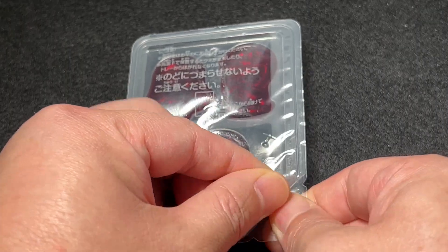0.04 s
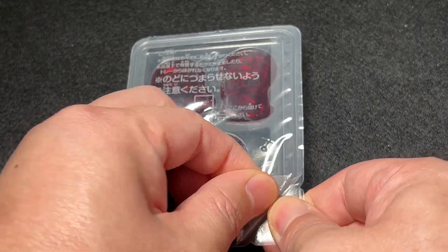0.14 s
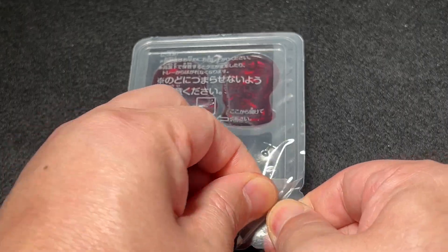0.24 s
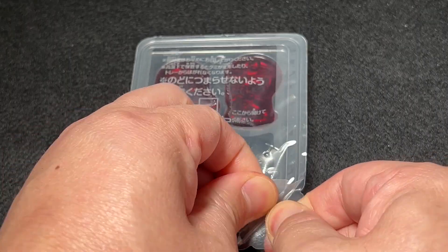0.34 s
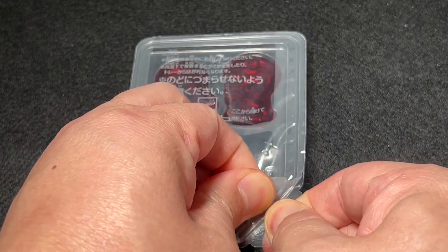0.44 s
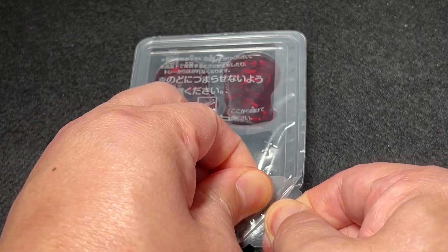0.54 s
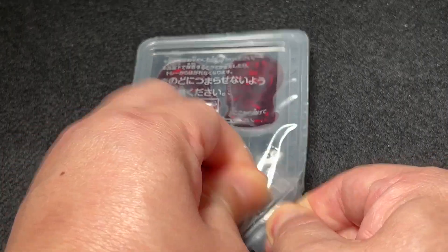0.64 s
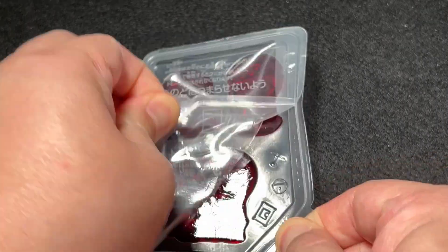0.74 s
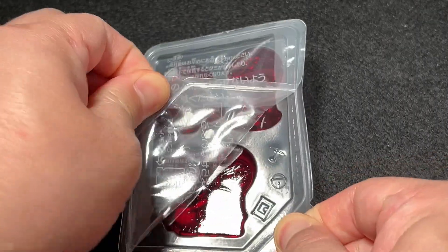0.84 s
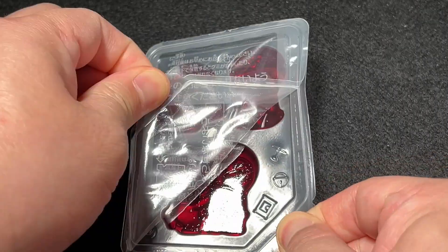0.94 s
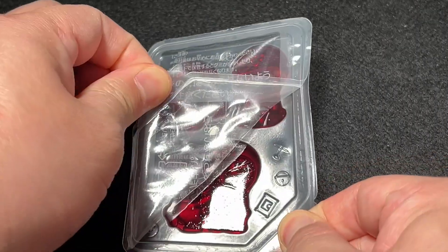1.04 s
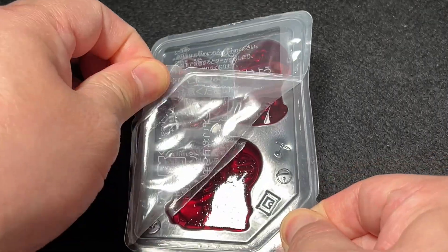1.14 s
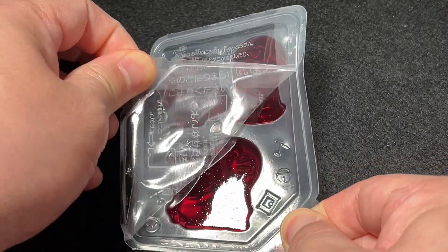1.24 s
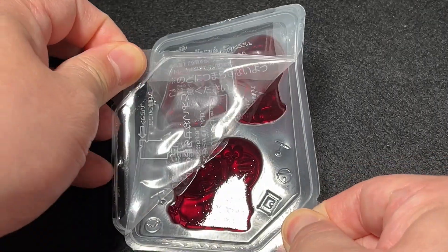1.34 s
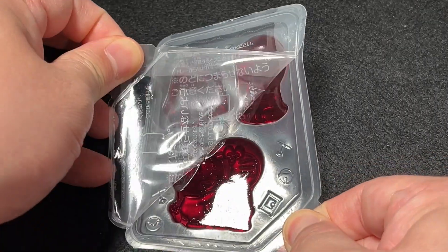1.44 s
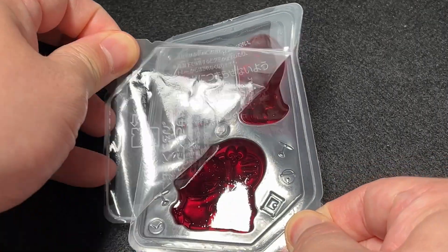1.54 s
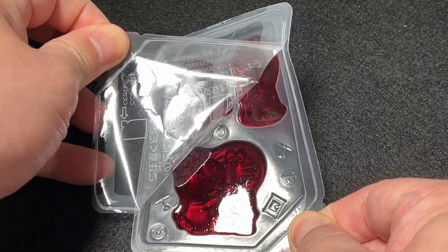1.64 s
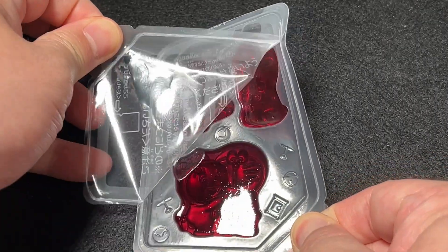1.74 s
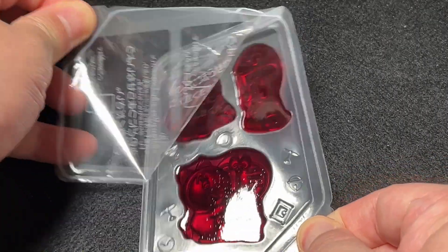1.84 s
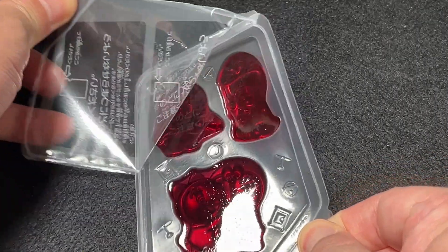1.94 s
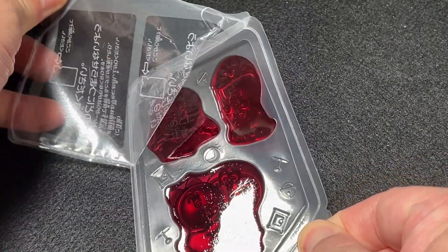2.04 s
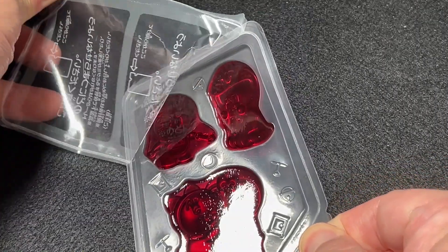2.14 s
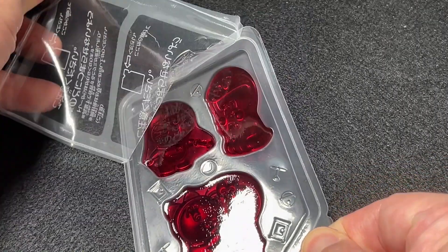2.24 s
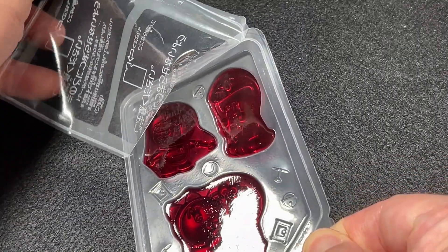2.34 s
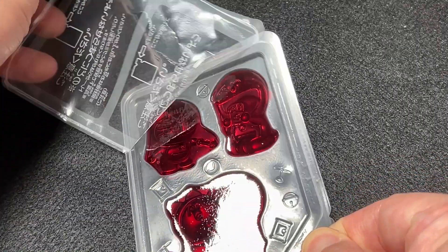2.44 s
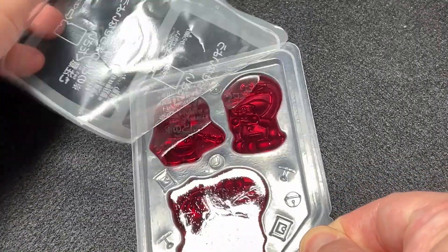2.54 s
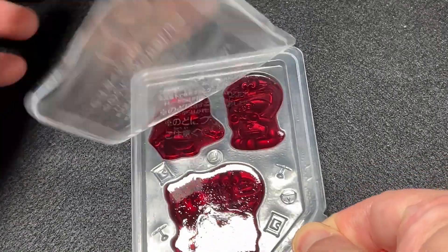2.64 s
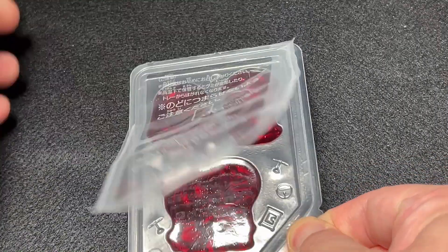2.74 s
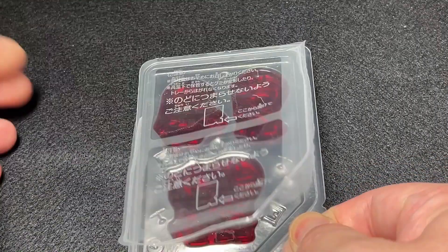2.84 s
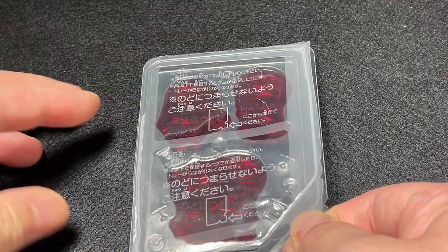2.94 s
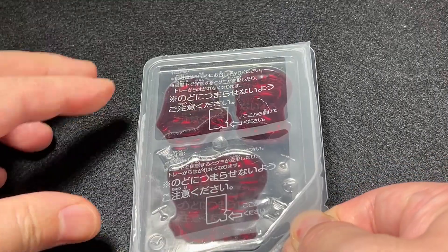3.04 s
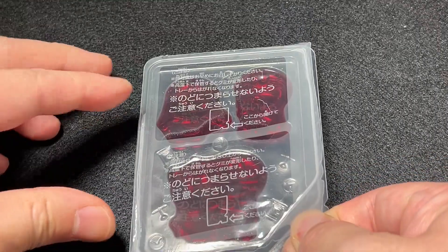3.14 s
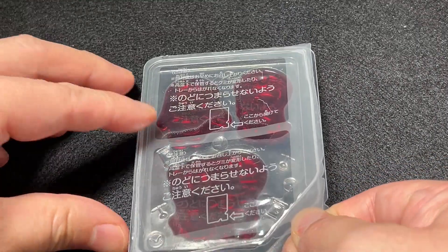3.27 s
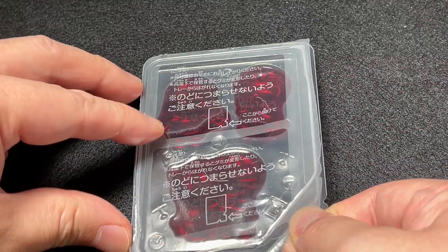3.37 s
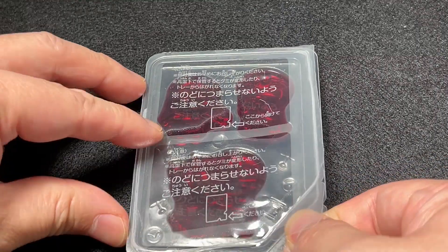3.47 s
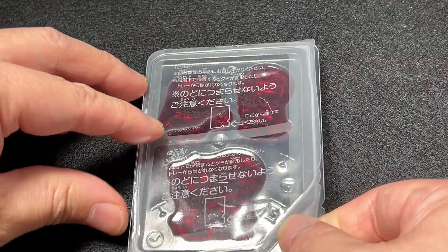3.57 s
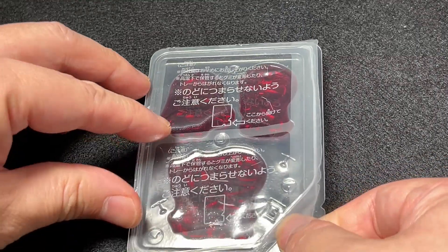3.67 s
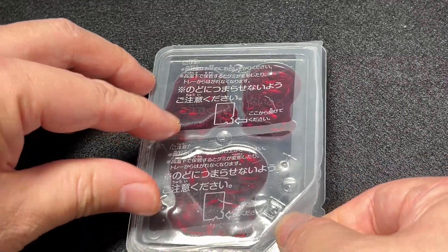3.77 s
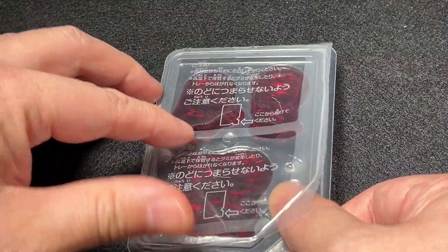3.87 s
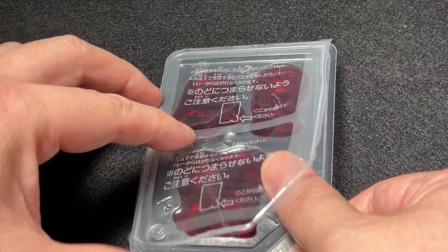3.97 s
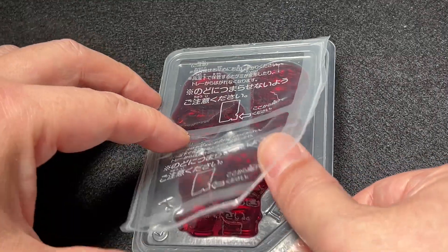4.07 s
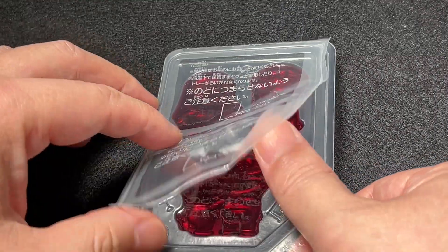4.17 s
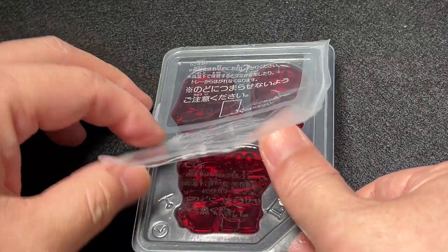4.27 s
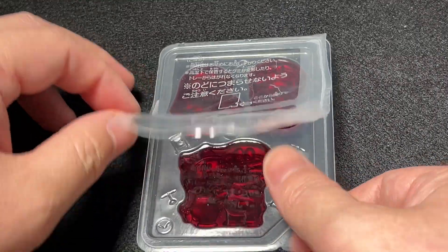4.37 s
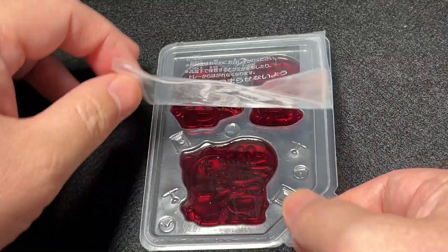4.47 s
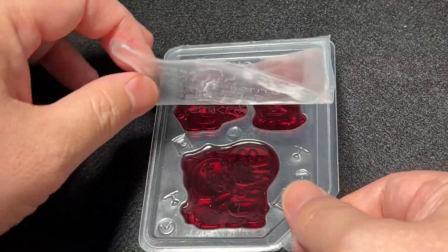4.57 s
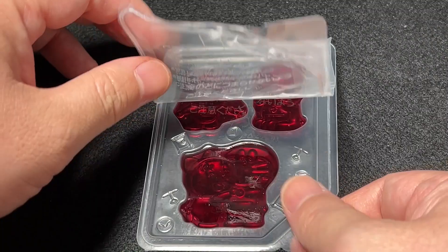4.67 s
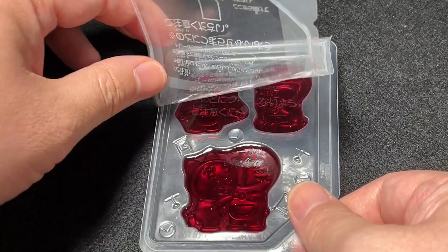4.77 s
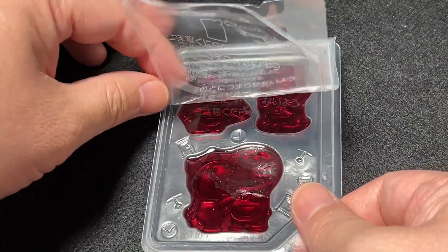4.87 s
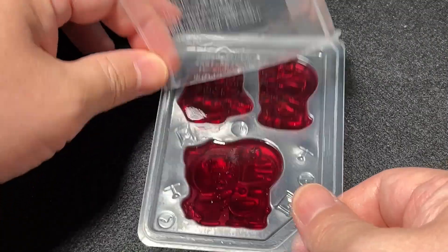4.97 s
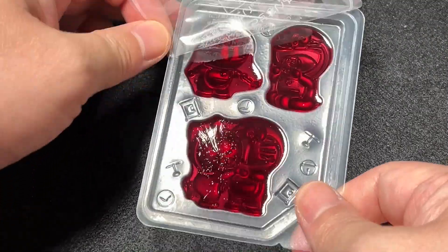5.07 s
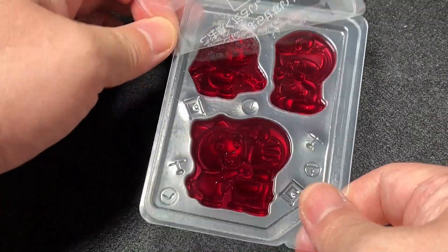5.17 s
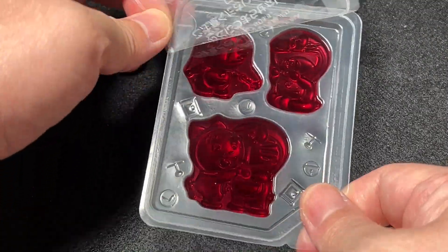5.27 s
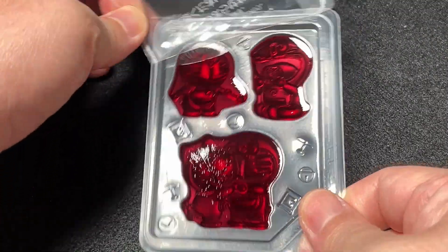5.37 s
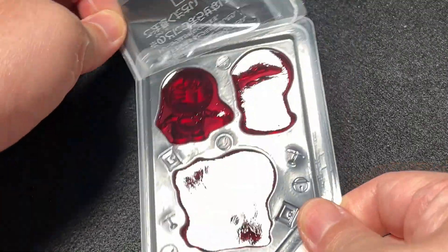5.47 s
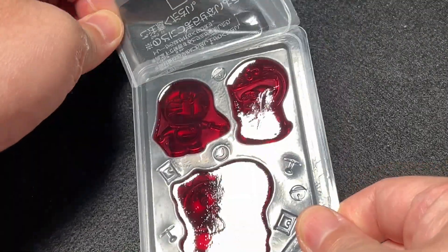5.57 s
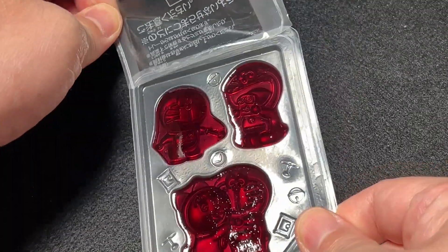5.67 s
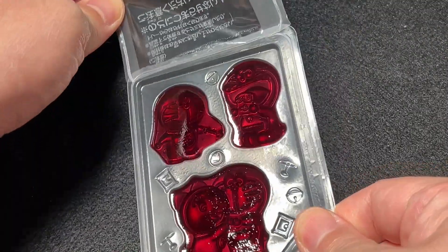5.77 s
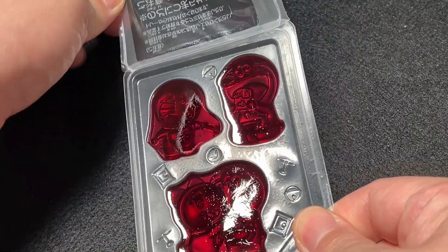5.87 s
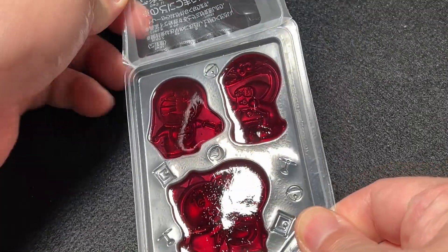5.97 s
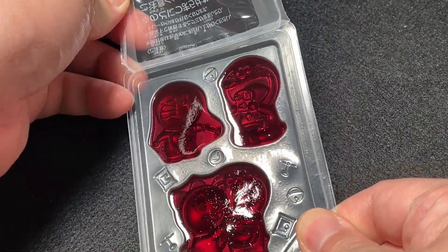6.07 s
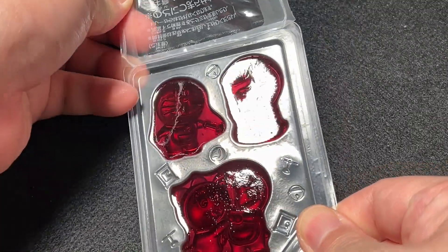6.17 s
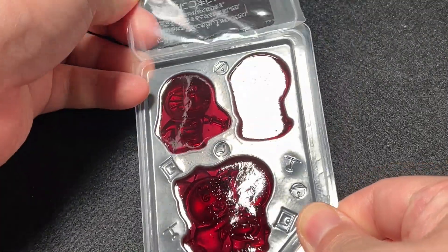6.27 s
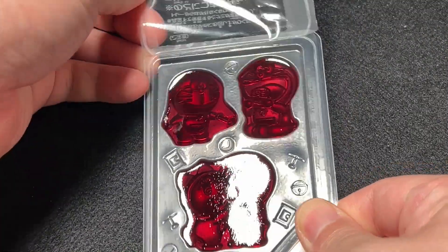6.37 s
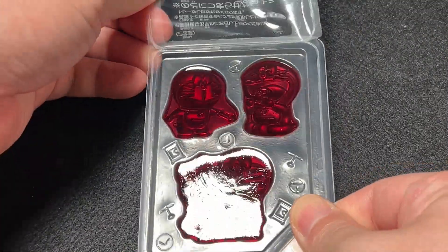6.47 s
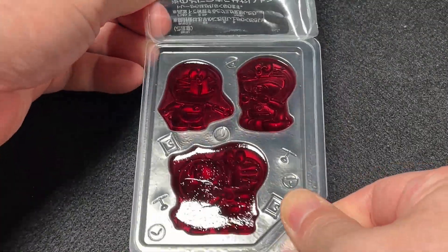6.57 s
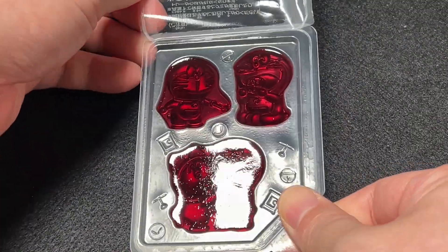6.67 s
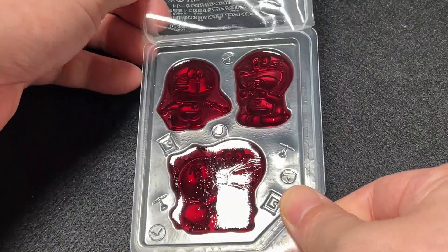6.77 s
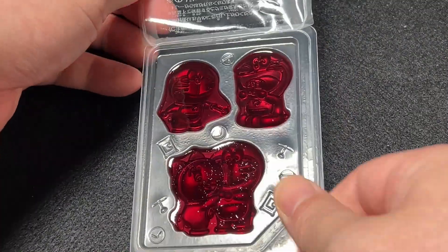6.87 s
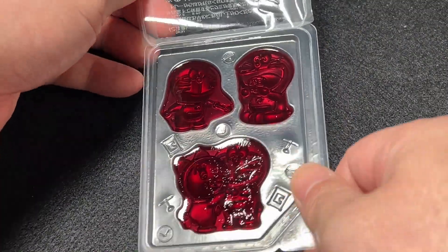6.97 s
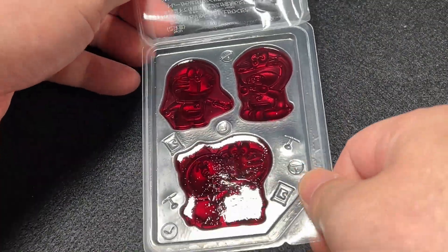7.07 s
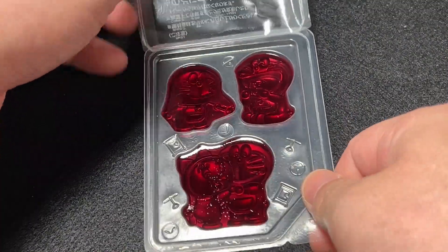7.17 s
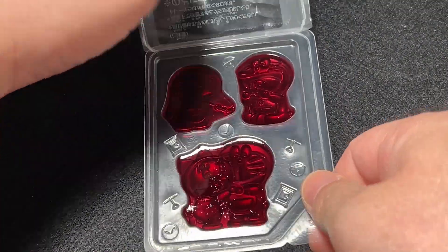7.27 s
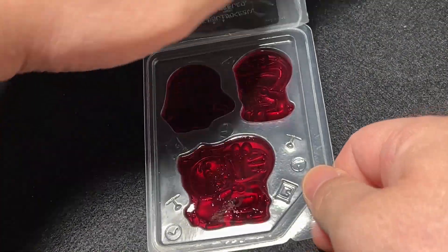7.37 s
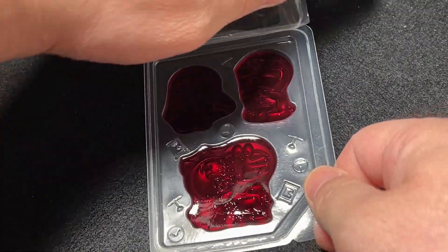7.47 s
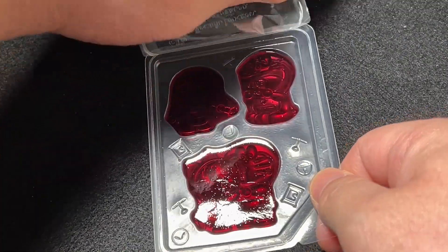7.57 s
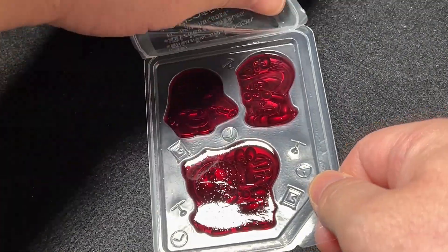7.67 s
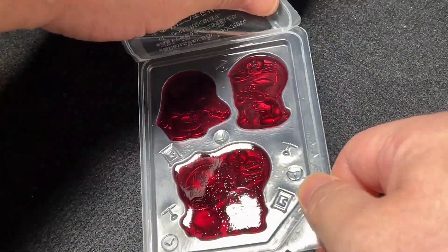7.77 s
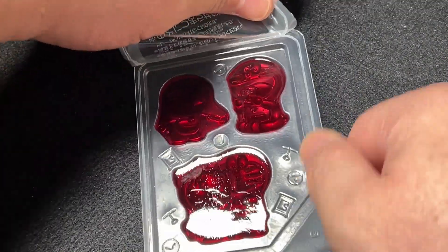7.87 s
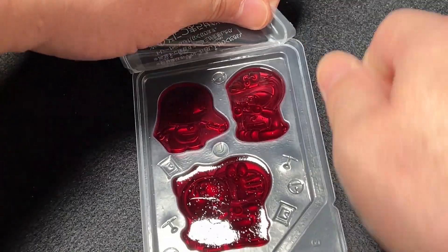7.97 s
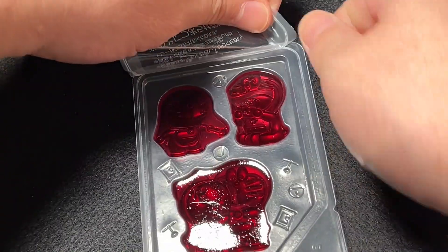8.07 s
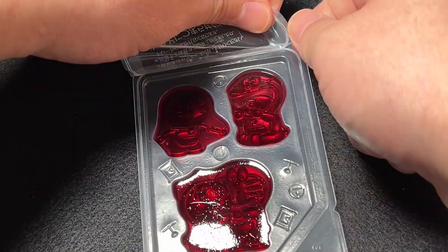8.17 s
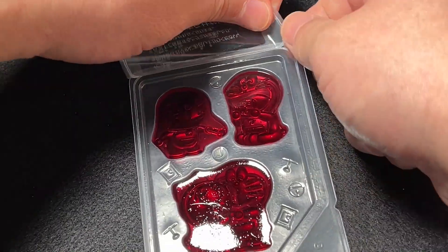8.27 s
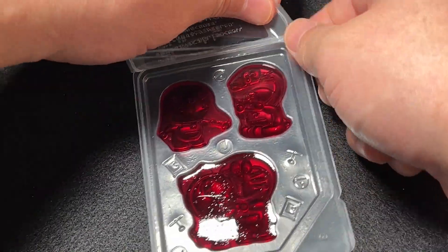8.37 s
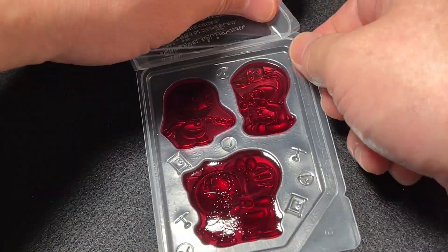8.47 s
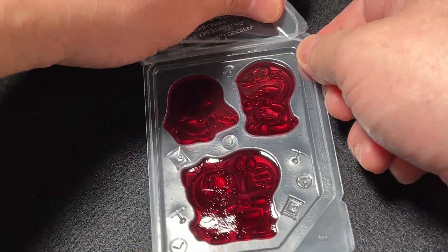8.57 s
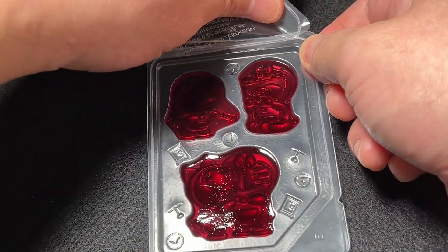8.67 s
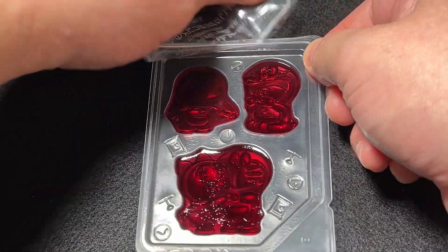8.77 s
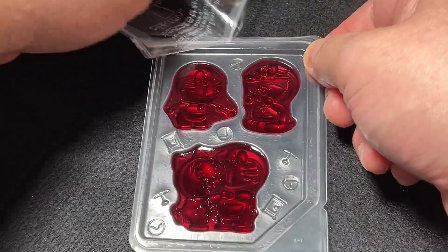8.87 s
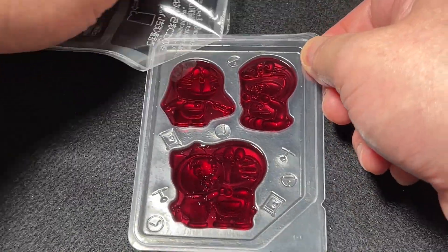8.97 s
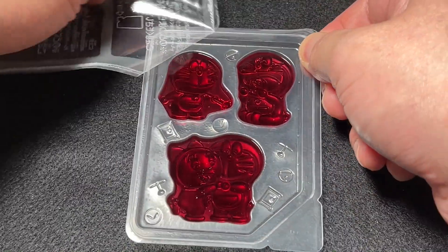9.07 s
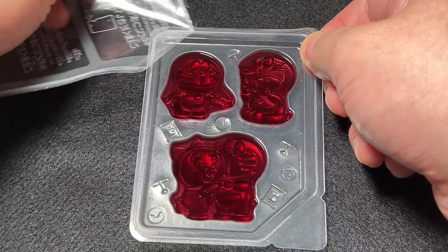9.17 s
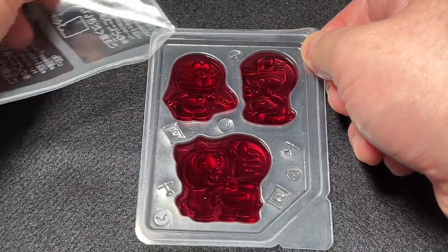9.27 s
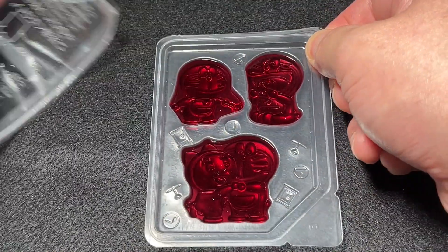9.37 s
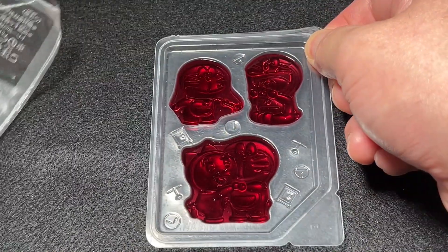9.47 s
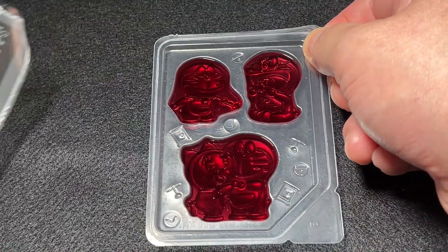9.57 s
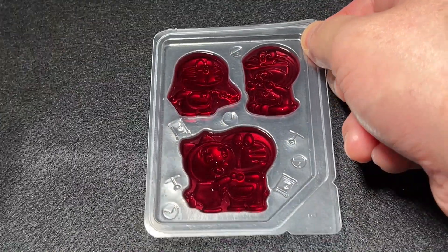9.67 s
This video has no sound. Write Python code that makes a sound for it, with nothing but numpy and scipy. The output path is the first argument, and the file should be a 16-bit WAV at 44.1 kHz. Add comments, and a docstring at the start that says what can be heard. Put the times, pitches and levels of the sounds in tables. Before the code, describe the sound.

Hands peel clear film from a stiff moulded tray on a cloth-covered table. Small ticks lead to a dense ripping burst, then irregular snaps grow loudest around two seconds. A nearly quiet pause follows, then lighter crackles, rustling and scattered pops, ending with one sharp snap as the film comes away. Close stereo microphone, dry quiet room, faint low rumble.

```python
"""In a quiet room, two hands peel a thin plastic film off a moulded plastic tray on a cloth, close by.
Creases and seals let go as snaps: short noisy slips that ring the modes of the tray and a patch of film.
Between them the film rustles: random tiny crackles, coloured and swelling with the strokes of the hands.
Now and then the tray bumps the table, a fading low tone with dull noise, over a rumble of shaped noise."""
import sys
import numpy as np
from scipy import signal
from scipy.fft import rfft, irfft
from scipy.io import wavfile
from scipy.ndimage import uniform_filter1d

SR = 44100
rng = np.random.default_rng(int(sys.argv[2]) if len(sys.argv) > 2 else 0)


def log_audio(samples):
    """Write samples as a 16-bit WAV file to the path given in sys.argv[1]."""
    # one column per channel
    frames = np.atleast_2d(samples).T
    # limit to full scale, then quantise
    limited = np.clip(frames, -1, 1)
    pcm = np.round(limited * 32767).astype(np.int16)
    wavfile.write(sys.argv[1], SR, pcm)


N = 428211  # length in samples


def gain_of(db):
    """Turns decibels into an amplitude factor."""
    return 10 ** (np.asarray(db) / 20)


def evened(x):
    """Scales a sound to an average (rms) level of 1."""
    return x / np.sqrt(np.mean(x ** 2) + 1e-20)


def peaked(x):
    """Scales a sound so that its highest peak is 1."""
    return x / (abs(x).max() + 1e-20)


def read(points, hz):
    """Reads between the points of a table, with frequency on a log scale."""
    f, value = np.transpose(points)
    return np.interp(np.log(hz + 1), np.log(f + 1), value)


def add(mix, s, sound):
    """Lays a sound into the mix, starting at s seconds."""
    part = mix[round(s * SR):][:len(sound)]
    part += sound[:len(part)]


def bands(x, edges):
    """Splits a sound into the bands below, between and above the edges (Hz)."""
    kinds = [(edges[0], "low")]
    kinds += [(pair, "band") for pair in zip(edges, edges[1:])]
    kinds += [(edges[-1], "high")]
    filters = [signal.butter(3, hz, kind, fs=SR, output="sos") for hz, kind in kinds]
    return [signal.sosfilt(sos, x) for sos in filters]


# Colour of the room rumble: f/Hz, level/dB (per Hz, relative)
RUMBLE_COLOUR = [(15, -38), (30, -16), (48, 4), (75, 1), (100, -14.5), (170, -16), (300, -29.5), (600, -38),
                 (1200, -51), (5000, -50.5), (16000, -56)]
# How alike the rumble is left and right: f/Hz, likeness (1 = the same)
RUMBLE_LIKENESS = [(60, 1), (600, 0.17), (5000, .8)]
RUMBLE_DB = -61.5  # rms level


def air():
    """Steady room rumble: shaped noise, alike in both channels at the bottom and less so higher up."""
    hz = np.fft.rfftfreq(N, 1 / SR)
    left, other = rfft(rng.standard_normal((2, N)))
    same = np.clip(read(RUMBLE_LIKENESS, hz), -1, 1)
    right = same * left + np.sqrt(1 - same ** 2) * other
    spectrum = np.array([left, right]) * gain_of(read(RUMBLE_COLOUR, hz))
    return gain_of(RUMBLE_DB) * evened(irfft(spectrum, N))


# How long the room rings on: f/Hz, time to fall by 60 dB/s
ROOM_FADE = [(200, 0.23), (1000, 0.29), (4000, .2), (12000, 0.25)]


def room(x):
    """Room echo: sparse taps of random sign, each band dying away at its own speed."""
    taps = np.zeros((2, SR // 2))
    # one tap at a random place in every 20 samples
    starts = np.arange(60, SR // 2 - 20, 20)
    at = starts + rng.integers(0, 20, (2, len(starts)))
    np.put_along_axis(taps, at, rng.choice([-1., 1.], at.shape), 1)
    hz, t, z = signal.stft(taps, SR, nperseg=256)
    fade = gain_of(-60 * t / read(ROOM_FADE, hz)[:, None])
    tail = signal.istft(z * fade, SR, nperseg=256)[1]
    tail /= np.linalg.norm(tail[0])
    return signal.fftconvolve(x[None], tail, axes=1)[:, :N]


def spread(x):
    """Hands and table throw back a few ms of dull echoes that reach the two sides with opposite sign."""
    echoes = rng.standard_normal(400) * np.exp(-np.arange(400) / 30.0)
    dull_echoes = uniform_filter1d(echoes, size=5) / np.linalg.norm(echoes)
    side = signal.oaconvolve(x, dull_echoes)[:N]
    side = bands(side, (250,))[1]  # only what lies above 250 Hz
    return side * np.array([[1], [-1]])


# Thuds on the cloth: t/s, level/dB (peak before the mix), f/Hz, time to fall by 60 dB/s
THUDS = [(.48, -45.5, 76.6, .15), (0.647, -31, 151.5, 0.09), (0.655, -34, 60, 0.24),
         (.715, -39.5, 43.8, 0.28), (1.55, -42, 201, 0.2), (1.796, -32.5, 178, 0.2), (2.13, -36, 203, 0.12),
         (2.235, -37.5, 203, 0.06), (4.239, -57, 161.1, 0.14), (5.902, -45, 133, 0.065),
         (8.71, -48, 169.6, 0.1), (7.958, -55.5, 194.2, 0.084), (9.178, -52.5, 168.2, 0.27),
         (9.34, -40.5, 194, 0.2)]


def bumps():
    """Soft thuds of tray and hands on the cloth: a low tone and dull noise that rise softly and fade."""
    out, t = np.zeros(N), np.arange(SR // 2) / SR
    for s, db, hz, t60 in THUDS:
        shake = rng.standard_normal(SR // 2)
        dull_noise = evened(uniform_filter1d(uniform_filter1d(shake, 90), 90))
        body = np.sin(2 * np.pi * hz * t) + .5 * dull_noise
        rise = 1 - np.exp(-t / 0.01)
        fade = gain_of(-60 * t / max(t60, .03))
        add(out, s, gain_of(db) * peaked(body * rise * fade))
    return out


def ring(hz, width, size=2048):
    """One damped mode after a click: a sine that dies sooner the wider its resonance (Hz)."""
    t = np.arange(size) / SR
    return np.exp(-np.pi * width * t) * np.sin(2 * np.pi * hz * t)


# Ways the tray can ring (modes): f/Hz, width/Hz, level/dB (relative)
TRAY_MODES = [(240, 250, -2.5), (380, 240, 1.5), (770, 910, -5), (1244, 200, -5.5), (1578, 260, -2.5),
              (2102, 120, -5), (2790, 500, -4.5), (3257, 120, -11.5), (4204, 690, -2), (5170, 280, -6.5),
              (6500, 2500, -1.5), (8730, 850, 0), (12400, 460, -9), (15200, 3000, -39)]


def tray_ring(luck_db=0):
    """All modes of the tray struck at once, with a dry tick; where the blow lands favours some modes."""
    gains = gain_of(np.array(TRAY_MODES)[:, 2] + luck_db)
    body = 0
    for k, (hz, width, _) in enumerate(TRAY_MODES):
        body = body + (-1) ** k * gains[k] * ring(hz, width)  # neighbours start in opposite directions
    tick = np.diff(ring(5000, 5700), prepend=0)
    return body + 3.9 * tick


STROKE_DROP_DB = 20  # drop over one swell or one fade
STROKE_BEND = 1.5  # above 1 a stroke holds its level and then stops short
WAKE_DB_PER_S = 300  # how fast the crackle left by a snap fades
# Crackle left by a snap, for the middle, bright and dull parts: level/dB (relative to the snap's part)
WAKE_LEVELS = (-38.5, -38, -19)
# The film held still, for the same three parts: level/dB (before the mix)
STILL_LEVELS = (-89, -94, -83.5)
# Strokes of the hands over the film: t/s (fullest), level/dB (before the mix), swell/s, fade/s,
# bright part level/dB, dull part level/dB (both relative to the stroke)
HAND_STROKES = [(0.12, -61.5, 0.077, 0.11, -1.5, -0.5), (0.392, -69.5, 0.33, 0.099, -7.5, 2),
                (0.472, -76.5, 0.0065, 0.12, -15.0, 8.5), (0.66, -30.5, 0.016, 0.063, -1, -10.5),
                (0.7, -30, 0.035, 0.041, -2.5, -11), (0.794, -54, 0.137, 0.04, -4.5, -4.5),
                (0.905, -76.5, 0.25, 0.041, -4.5, -18.5), (1.212, -61, 0.094, 0.015, -11, -7.5),
                (1.274, -61.5, 0.16, 0.14, -4, -2.5), (1.514, -69, 0.063, 0.018, 2, -8),
                (1.622, -61, 0.12, 0.021, -6, 5), (1.723, -63.5, 0.124, 0.043, -2.5, 1.0),
                (1.882, -50.5, 0.39, 0.15, -2.5, -3), (2.022, -62.5, 0.098, 0.035, -5, 7),
                (2.091, -61.0, 0.129, 0.19, -2, 1), (2.25, -62.5, 0.25, 0.26, -2.5, -5),
                (2.397, -66.5, 0.019, 0.189, 7, -19), (2.569, -64, 0.248, 0.24, -16.5, 4.5),
                (2.759, -70, 0.008, 0.041, -11, 12), (2.902, -68, 0.12, 0.089, -5.5, -6.0),
                (3.038, -71, 0.076, 0.205, -4.5, -9.5), (3.24, -78.5, 0.25, 0.24, -12, -4.0),
                (3.405, -75, 0.128, 0.163, -7, -3.0), (3.505, -73.5, 0.083, 0.249, -9, -8.0),
                (3.824, -61.5, 0.058, 0.11, -4.5, -18.0), (3.999, -74, 0.239, 0.11, -4.5, -18),
                (4.121, -71.5, 0.008, 0.064, -16.0, -17.0), (4.2, -69.5, 0.069, 0.146, -3.5, -2),
                (4.321, -64.5, 0.049, 0.14, -2.5, 2), (4.507, -68, 0.056, 0.039, -4.0, -4.0),
                (4.551, -65.5, 0.037, 0.051, 1.5, 3.5), (4.667, -73, 0.126, 0.047, -0.5, -11),
                (4.74, -65.5, 0.039, 0.126, 5, -12.5), (4.849, -62.5, 0.13, 0.034, 5.5, -7.5),
                (5.082, -64.5, 0.27, 0.15, -7.5, -4.0), (5.18, -71, 0.19, 0.045, -4, -18),
                (5.269, -59.5, 0.0081, 0.026, -14.5, 0.5), (5.361, -54, 0.1, 0.22, -6.5, -3),
                (5.649, -63, 0.15, 0.2, -6, -3.0), (5.855, -60.5, 0.14, 0.25, -5.5, 2),
                (6.073, -55.0, 0.11, 0.064, -11.5, -5.5), (6.136, -66, 0.096, 0.072, -15, -6.5),
                (6.376, -51, 0.12, 0.059, -13.5, -16.5), (6.487, -59.0, 0.074, 0.04, -11, -11),
                (6.567, -65.5, 0.062, 0.031, -6, 9), (6.64, -65.5, 0.062, 0.13, -12.5, 3.5),
                (6.857, -63.5, 0.06, 0.162, 0, -1.0), (6.962, -58.5, 0.008, 0.081, -10.0, -11.0),
                (7.114, -59.5, 0.051, 0.035, -5, -7.5), (7.24, -70, 0.19, 0.025, -3.0, -9.5),
                (7.418, -71.5, 0.014, 0.048, 8, -2.5), (7.577, -61.0, 0.065, 0.25, -9, 5.0),
                (7.705, -58.5, 0.09, 0.14, 1.0, -20), (7.793, -60.5, 0.019, 0.14, -3, -1),
                (7.984, -69, 0.083, 0.079, 1.0, 4), (8.197, -67.5, 0.15, 0.034, -4.5, -6.5),
                (8.24, -60.5, 0.034, 0.063, -4.5, 0), (8.448, -63.5, 0.16, 0.051, -6.5, -14.0),
                (8.49, -63, 0.025, 0.04, -14.5, -14), (8.611, -76.5, 0.07, 0.027, -5.5, -6.5),
                (8.745, -46, 0.037, 0.21, -6, -7), (8.919, -48.5, 0.066, 0.031, -2, -10),
                (8.974, -60.5, 0.219, 0.17, 0, -11.5), (9.124, -55, 0.053, 0.35, -6, -4),
                (9.3, -57.0, 0.25, 0.2, -4.0, -2.0), (9.458, -65.5, 0.097, 0.07, -2, -3),
                (9.706, -57, 0.066, 0.06, -11, 5.0)]


def handling(step=64):
    """Rustle level of the middle, bright and dull parts: still film, hand strokes and the wake of snaps."""
    t = np.arange(0, N + step, step) / SR
    s, db, swell, fade, bright, dull = np.transpose(HAND_STROKES)[:, :, None]
    distance = np.where(t < s, (s - t) / abs(swell), (t - s) / abs(fade))
    shape = db - STROKE_DROP_DB * distance ** STROKE_BEND
    strokes = (shape, shape + bright, shape + dull)

    s, ring_db, crack, edge, flex, _ = np.transpose(PEEL_SNAPS)[:, :, None]
    wake = np.where(t < s, -200, -WAKE_DB_PER_S * (t - s))  # practically silent before the snap
    crack_db = ring_db + crack
    snap_parts = (np.maximum(ring_db, crack_db), crack_db + edge, ring_db + flex)

    levels = []
    for still, stroke, snap, left in zip(STILL_LEVELS, strokes, snap_parts, WAKE_LEVELS):
        # twice the decibels gives power, and powers add up
        power = gain_of(2 * still) + gain_of(2 * stroke).sum(0) + gain_of(2 * (wake + snap + left)).sum(0)
        levels.append(np.interp(np.arange(N) / SR, t, np.sqrt(power)))
    return levels


# Colour of the film's rustle: f/Hz, level/dB (per Hz, relative)
FILM_COLOUR = [(60, -34.5), (120, -2), (350, -5), (600, -15.5), (1000, -11), (1500, -5), (2600, -7),
               (4500, -12), (8000, -14.5), (12000, -20), (15500, -23.5), (17000, -37.5)]


def rustle(per_s=2900.0, spread_db=1.5, smooth=0.55, clump_db=1.0, patchy_db=2.0):
    """Countless small creases of uneven size, in clumps, with the hiss of skin on film."""
    size = gain_of(spread_db * np.minimum(rng.exponential(1, N), 4.5))
    size *= rng.random(N) < per_s / SR  # only some samples hold a crease
    creases = evened(size * rng.standard_normal(N))
    ticks = creases + smooth * rng.standard_normal(N)  # plus the hiss of skin
    ticks *= gain_of(clump_db * evened(uniform_filter1d(rng.standard_normal(N), 500)))

    film = irfft(rfft(ticks) * gain_of(read(FILM_COLOUR, np.fft.rfftfreq(N, 1 / SR))), N)
    tray = signal.oaconvolve(ticks, tray_ring())[:N]
    sound = evened(film) + 0.14 * evened(tray)

    # the colour shifts as the film bends
    z = signal.stft(sound, nperseg=256)[2]
    drift = uniform_filter1d(rng.standard_normal(z.shape[::-1]), 40, 0)  # slow in time
    patches = uniform_filter1d(drift, 4, 1).T  # broad in frequency
    sound = signal.istft(z * gain_of(patchy_db * evened(patches)), nperseg=256)[1][:N]

    dull, middle, bright = bands(sound, (900, 4500))
    return sum(level * evened(part) for level, part in zip(handling(), (middle, bright, dull)))


SLIP_MS = .5  # base slip time in ms, before the adjustments for crack level, pitch and chance
SLIP_MS_PER_DB = 0.0263  # faint and dull snaps let go more slowly
SLIP_PITCH_POWER = -0.33  # small high patches let go faster
SLIP_SCATTER = 0.16  # chance spread of the slip time, as a natural logarithm
# Snaps of the film: t/s, tray ring level/dB (peak before the mix), film crack level/dB (over the ring),
# bright edge level/dB (over the crack), tray bending level/dB (over the ring), pitch of the patch f/Hz
PEEL_SNAPS = [(0.0568, -34.5, -15, -9, -23, 1370), (0.071, -42.5, 10, -5, -24, 2410),
              (0.0794, -36.5, 11, 1.5, -30, 2540), (0.0983, -36.5, 4, 0, -25.0, 6370),
              (0.2009, -37.5, 8.5, -14, -9, 3840), (0.2628, -29.5, 8, -30, -22.5, 2510),
              (0.3196, -39.5, 4.5, -29, -13.5, 5460), (0.3516, -25.5, 0.0, -13.5, -24, 980),
              (0.4735, -56.5, 2.5, 5.5, 5, 7600), (0.6415, -41, 1, 15, 0, 7440),
              (0.6451, -20, 4, 15, -11, 8640), (0.668, -18, 8, -3, -19.0, 4340),
              (0.6746, -21.5, 5, -13, -19, 4760), (0.6854, -24.5, 11.0, 0.0, -12, 4840),
              (0.6912, -24.5, 12.5, -14, -14, 4400), (0.6962, -22.5, 10.5, -12, -9, 4570),
              (0.7051, -16, 15.5, -2, -15, 5630), (0.7157, -27.5, 9.5, -10.0, -14, 4890),
              (0.7978, -45, 2, -2, -15, 1590), (0.8623, -67, 12, -11, -8, 3070),
              (1.0688, -43, 9.5, -7, -21, 2724), (1.142, -52.0, -7, -15, 3, 1980),
              (1.2992, -49.0, 2.5, -6.5, -7.5, 1550), (1.3212, -56, -3, -10, 1, 720),
              (1.428, -27.5, -7.5, -2.5, -31.5, 2230), (1.4385, -30.5, 9.5, -3.0, -7.5, 5240),
              (1.5297, -43.0, 4.5, -2.5, -5.5, 1510), (1.546, -32.0, 2, -4, -4, 2170),
              (1.5522, -13.5, 3, -3.5, -13.5, 1440), (1.5866, -37, -9, -11, -2, 2480),
              (1.6551, -35, 3.5, -17, -14, 3130), (1.67, -35, 1.5, 1.5, -2, 1460),
              (1.707, -30.5, -3.5, -25, -14, 1630), (1.7613, -24, 6, -4.5, -24.5, 3200),
              (1.792, -24.5, 4.0, 1, -12, 2910), (1.7961, -12, 7.5, -1.5, -19.0, 3260),
              (1.8012, -15.5, 4, -5, -19, 1680), (1.8185, -25.5, 0.0, -8.5, -9, 1420),
              (1.8397, -34, 14, -3.5, -7.5, 5200), (1.8638, -34.5, -8, -4.0, -8, 2200),
              (1.9012, -20, 4.5, -8, -20, 3270), (1.9464, -21, 4.5, -14, -13, 4370),
              (2.0239, -22.5, 3, 4, -31.0, 8140), (2.1244, -24.5, -26, -11.5, -21, 1360),
              (2.1283, -15.0, -3, -9, -17.5, 1640), (2.1502, -6.0, -2, 5.5, -22.5, 2260),
              (2.1685, -17, 5.5, -6, -21, 1660), (2.1754, -19.0, -3, -2, -8, 1460),
              (2.1976, -31.5, -14, -13, -9, 1510), (2.2337, -21.0, -0.5, -4, -8.5, 1500),
              (2.4339, -32, -5.5, -12, -9.0, 1480), (2.4452, -3.5, -3, -3.5, -31, 1580),
              (2.4629, -25.0, -5.5, -2, -12, 1700), (2.5272, -36, -15, -7.5, -17.0, 1510),
              (2.5439, -43.5, -3, -1.5, 2, 730), (2.5662, -13.0, 1, -3, -22.0, 2500),
              (2.596, -25.5, 2, -2.0, -17, 2600), (2.6854, -20.0, 7, -10, -19.5, 2640),
              (2.8296, -49.5, 5.5, -18, -15.5, 2740), (2.8386, -41.5, -4.0, -22.0, -12.5, 1720),
              (3.4977, -52.5, 12.0, -12, -13.0, 4180), (3.9636, -52.5, -3, -11.5, -18.0, 1722),
              (4.1716, -37, 13.5, -14.5, -3, 5530), (4.2312, -52.5, -13, -5, -0.5, 870),
              (4.2942, -64.5, -1, -0.5, 13.5, 600), (4.412, -46, -2.0, -22.5, 0.0, 1890),
              (4.8011, -31.5, -6, -9, -4.5, 1610), (4.871, -42, -10.5, -11.5, -18.0, 1490),
              (4.956, -50.5, -15.5, -9.5, -2.0, 840), (4.99, -27, -9.5, -15.5, -8.5, 2220),
              (5.011, -31, -8.5, -6, -13.5, 1450), (5.032, -27.5, 3, -11, -10.5, 2220),
              (5.048, -19, 2, -4, -23.5, 2170), (5.1132, -42, -1, -7, -12.5, 2110),
              (5.1296, -40, -17, -7.5, 0.5, 1510), (5.1682, -52.5, 2.5, 10, -6.0, 8850),
              (5.241, -44.5, -20.5, -14.5, -3.5, 1345), (5.3042, -17.5, 6.0, -6.5, -21, 2640),
              (5.3351, -31, -8.5, -14, -4, 1640), (5.3751, -40, -16, -6, -1.5, 690),
              (5.437, -33.5, -15, -7.0, -6, 1430), (5.4528, -32, -10, -17.0, -9.0, 1240),
              (5.4593, -25.5, -5, -16, -19, 2300), (5.6643, -23.5, 4, -10, -8, 2160),
              (5.8582, -25.5, 2, -12, -14, 2430), (5.88, -24, -20.5, -13.5, -28.5, 1610),
              (5.895, -24.0, -13, -15.0, -10, 1490), (5.9056, -25.5, -1.5, -4.5, -2.5, 1810),
              (5.9264, -30, -16.5, -1, -12.0, 1250), (5.9625, -55.5, -9, -6, 7, 600),
              (6.019, -43, -5.5, -6.5, -14, 1520), (6.2237, -25.5, -8, -20.5, -10.5, 1530),
              (6.244, -58, 4.5, 7.5, -6.5, 9110), (6.2825, -17.5, -5.5, -9.5, -9.5, 1400),
              (6.2965, -31.5, -16, 7, -8, 1360), (6.3915, -38, -15.0, -7, -1, 1550),
              (6.4367, -44, 2, -13, -11.0, 1760), (6.4472, -40, -8.5, -12.0, -18, 1610),
              (6.5443, -33, -5, -13, -14, 1350), (6.5674, -45.5, -10, -2, -3, 1530),
              (6.6112, -36.5, -2.5, 4.5, -24.0, 1530), (6.633, -43.5, -15.0, 2, -6.5, 1610),
              (6.6525, -38, -14, -1.5, -28.5, 1610), (6.665, -39.5, -15, -12, -7.0, 2200),
              (6.692, -30.5, -13, -27.5, -11.5, 1327), (6.7139, -43, -21, -15, -1, 1540),
              (6.807, -57.5, 0, -5.5, -7, 2666), (6.963, -43, -7, -10, -19, 1530),
              (7.0835, -50, -0.5, -1, -15.0, 1574), (7.1235, -47.5, -3.5, -1, -15.0, 1490),
              (7.56, -34, 3.5, -15, -9, 2020), (7.5905, -33, -5, -18, -8, 1490),
              (7.6118, -27.0, -2.5, -24, -9.5, 1520), (7.6475, -39, -5.5, -12.5, -13, 1890),
              (7.6798, -33.5, 5, -1.5, -13, 2300), (7.705, -44.5, -1, 1.0, -18, 5490),
              (7.7583, -32, -10, -3.5, -14, 2005), (8.165, -48.5, -1, -12, -19.5, 1526),
              (8.2334, -25, 12, -9, -32.5, 3130), (8.299, -51, 6, -10, -6.5, 2220),
              (8.336, -38.5, -2.5, -12, -23, 1580), (8.3655, -37, -3.5, -15, -21, 2130),
              (8.4212, -59, 0.5, -4.5, -14, 2085), (8.5789, -58, -9.0, -12.5, -3.5, 2027),
              (8.7072, -33.5, -14.5, -0.5, -12.0, 1550), (8.7277, -41, 1, -4, -9.5, 2200),
              (8.7492, -38.5, -2, -5.0, -15.5, 1550), (8.797, -36, 2, -7.0, -13, 1250),
              (8.8152, -36.5, 4, -7.0, -5, 930), (8.836, -14, 2, -5.0, -18.5, 2110),
              (8.857, -40.5, 5, -7, -13, 3490), (8.9057, -45.5, 9.5, -5, -2, 2520),
              (8.915, -33.0, 3, 2, -11.0, 3170), (8.921, -32, 3.5, -5, -15, 1610),
              (8.924, -31.0, -3, 2.0, -10, 1550), (8.9552, -59.5, 12, 5, -2.5, 2830),
              (9.2832, -52.5, 8, 4, -11, 2520), (9.3346, -25, 2.0, -4.5, -10.5, 900),
              (9.3664, -29, 3.5, -14.5, -6.5, 2840), (9.6326, -49.5, -5, -19, -10.5, 1330),
              (9.6578, -45.5, -8.5, -13.5, -11, 1430), (9.689, -43, -5, -18.0, -11, 1533),
              (9.7027, -37, 2, -13, -15, 2200)]


def snaps():
    """A slip of a millisecond or so shakes the tray and its own patch of film."""
    out, t = np.zeros(N), np.arange(1024) / SR
    for s, ring_db, crack, edge, flex, hz in PEEL_SNAPS:
        crack_db = ring_db + crack
        edge_db = crack_db + edge
        flex_db = ring_db + flex

        ms = SLIP_MS - SLIP_MS_PER_DB * crack_db
        ms *= (hz / 2000) ** SLIP_PITCH_POWER
        ms *= np.exp(SLIP_SCATTER * rng.standard_normal())
        u = t / (max(ms, .15) / 1000)  # time counted in slip times
        fade = np.exp(-u) + 0.14 * np.exp(-u / 6.3)  # fine crackle trails the slip
        slip = rng.standard_normal(1024) * (1 - np.exp(-u * 2.0)) * fade

        patch = gain_of(3.5) * ring(hz, 200 + 0.087 * hz)
        tray = tray_ring(2.5 * rng.standard_normal(len(TRAY_MODES)))
        sound = signal.fftconvolve(slip, tray + patch)
        _, bending, ringing, cracking, bright = bands(sound, (160, 900, 2500, 6000))
        snap = gain_of(ring_db) * peaked(ringing)
        snap += gain_of(crack_db) * peaked(cracking)
        snap += gain_of(edge_db) * peaked(bright)
        add(out, s, snap)
        add(out, s + .0015, gain_of(flex_db) * peaked(bending))  # slow bending waves arrive late
    return out


def scene():
    """Film and tray nearly alike left and right, their side echoes of opposite sign, a little room, and the
    rumble."""
    near = snaps() + rustle() + bumps()
    direct = near * gain_of([[-.2], [.2]])  # dB left, right
    return direct + gain_of(-30) * room(near) + gain_of(-15.0) * spread(near) + air()


# Phase between the two microphone ports: f/Hz, lead of the left/radians
PORT_PHASE = [(0, 0), (860, -.4), (1600, .1), (3200, -.6), (6800, -.2), (8300, -.9), (9300, 1),
              (15600, 12.5), (22050, 12.6)]
TREBLE_LIMIT_HZ = 16800


def record(dry):
    """The two microphone ports drift apart in phase towards the treble; then soft overload and band limit."""
    lead = np.interp(np.fft.rfftfreq(N, 1 / SR), *np.transpose(PORT_PHASE))
    turn = np.exp(.5j * lead)  # half the lead forward on the left, half back on the right
    ports = irfft(rfft(dry) * np.array([turn, 1 / turn]), N)
    ports = ports / (1 + (ports / .88) ** 4) ** .25  # the loudest peaks are rounded off softly
    low_pass = signal.firwin(511, TREBLE_LIMIT_HZ, window=("kaiser", 9), fs=SR)
    return signal.oaconvolve(ports, low_pass[None], "same")


dry = scene()
out = record(dry)
log_audio(out)
```